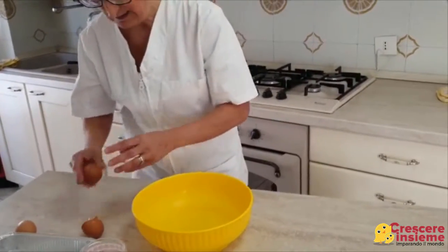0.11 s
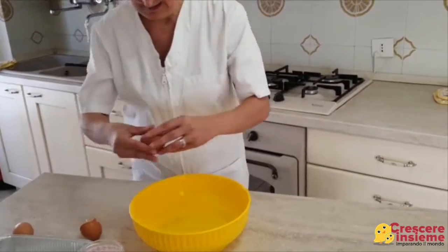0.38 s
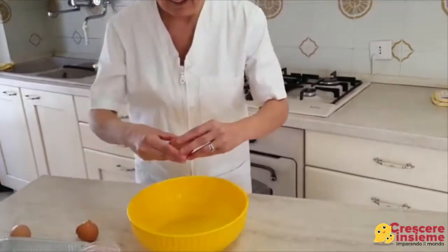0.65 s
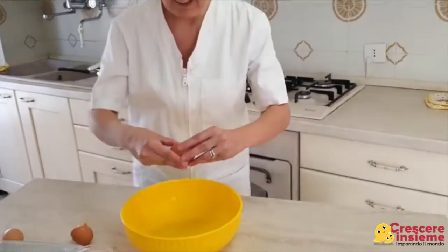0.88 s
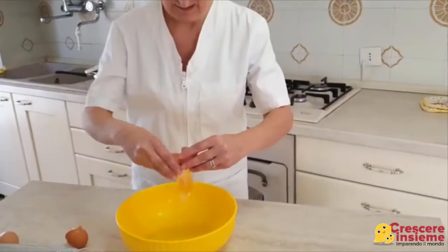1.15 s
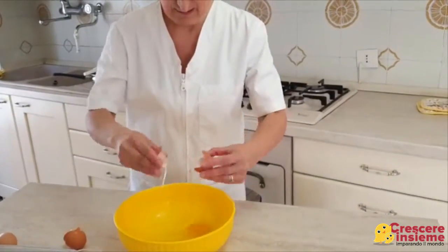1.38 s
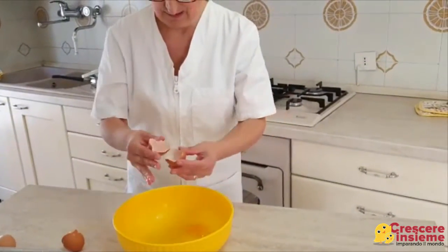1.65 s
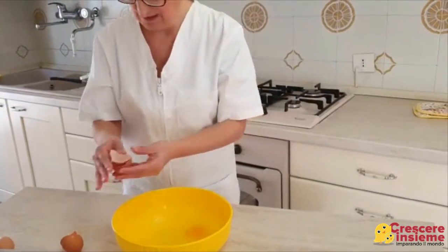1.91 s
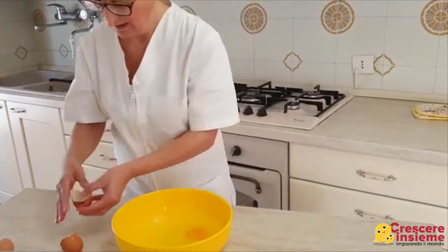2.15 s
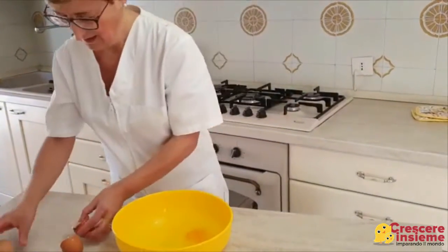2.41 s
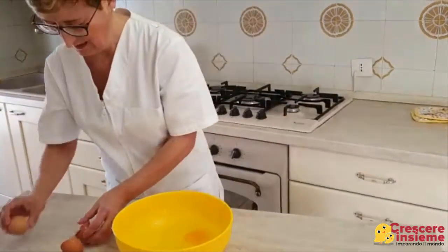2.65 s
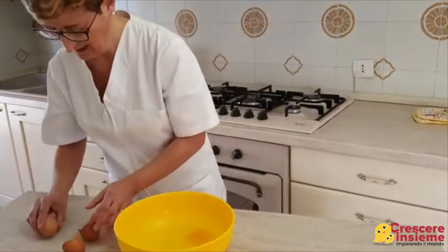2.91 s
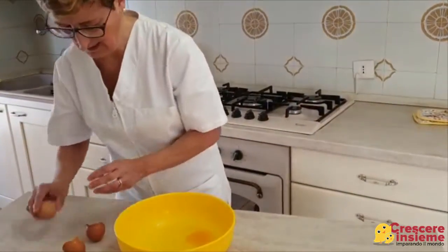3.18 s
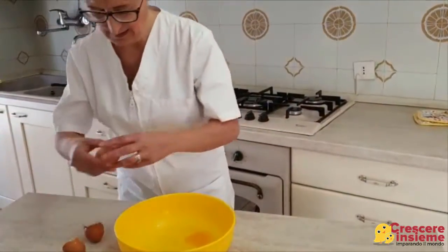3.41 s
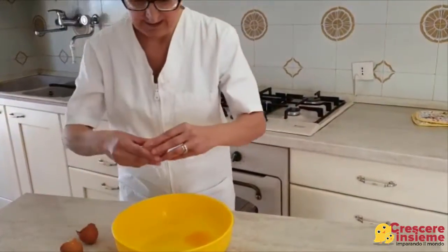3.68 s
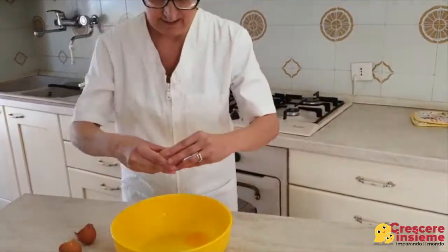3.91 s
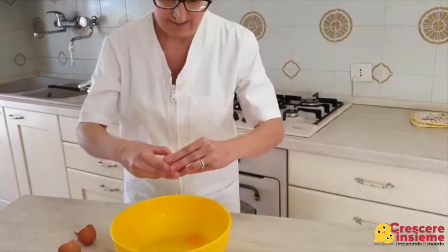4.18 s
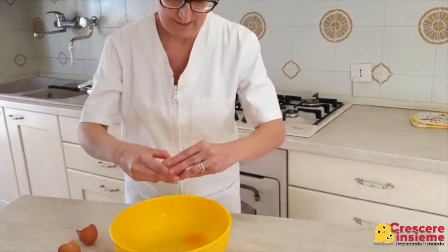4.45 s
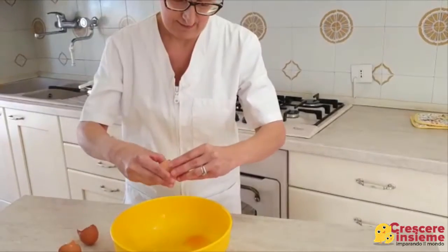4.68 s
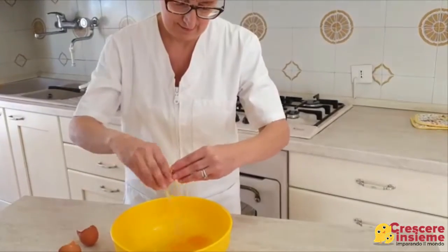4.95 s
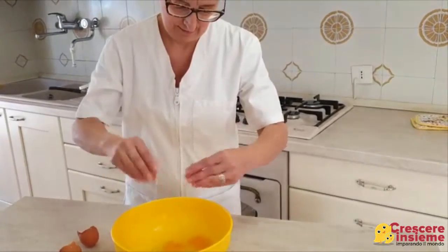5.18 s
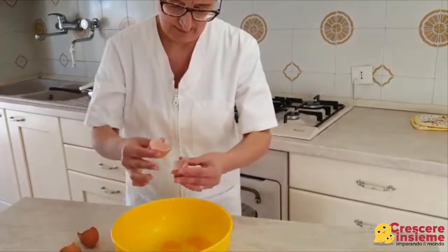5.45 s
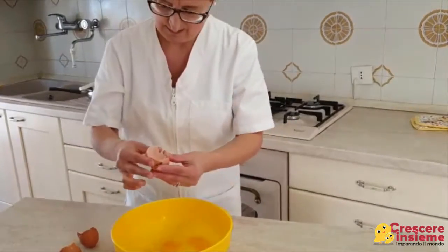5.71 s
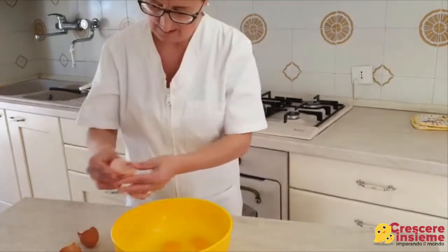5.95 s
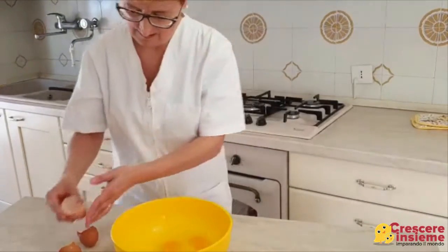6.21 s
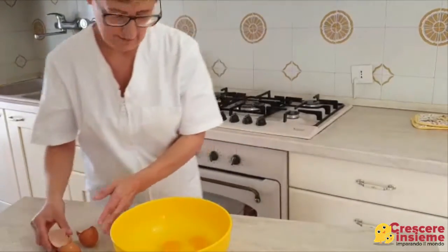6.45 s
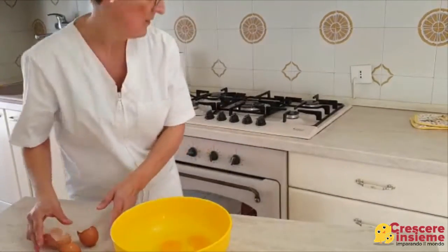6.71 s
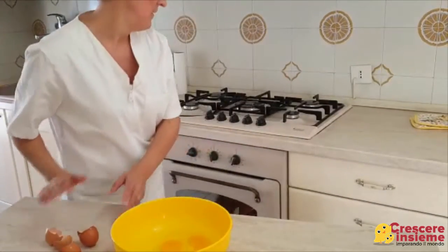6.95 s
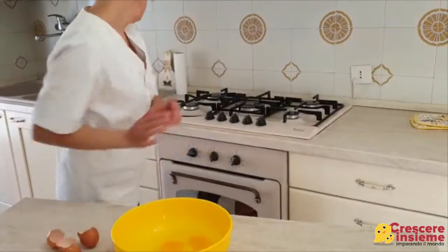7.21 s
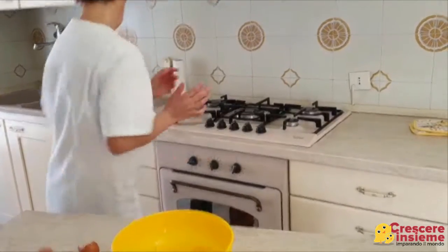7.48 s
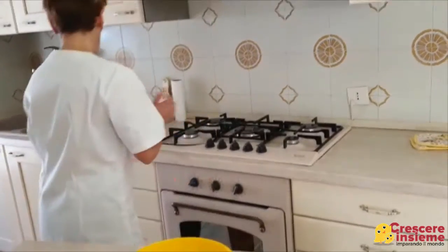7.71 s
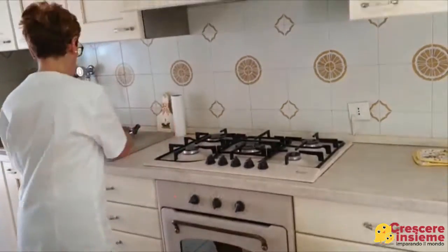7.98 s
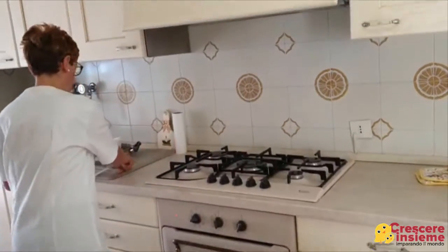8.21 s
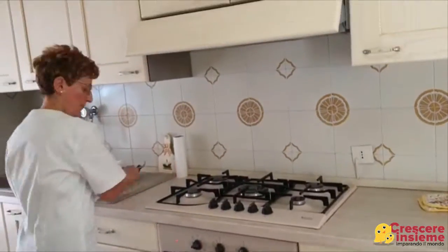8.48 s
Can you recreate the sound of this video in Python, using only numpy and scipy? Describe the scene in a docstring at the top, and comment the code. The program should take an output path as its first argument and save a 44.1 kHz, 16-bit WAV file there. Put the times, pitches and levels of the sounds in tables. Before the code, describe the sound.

Eggs are knocked on a stone counter and pulled open with crisp shell crackles, then shells clatter down in an echoing kitchen.

```python
"""Eggs opened in a hard kitchen

Two eggs are knocked on a stone counter, pulled open over a plastic bowl and their shells are nested and put down,
a few metres from a two-microphone phone in an echoing kitchen. Then a shoe squeaks, feet fall near the phone and a
hand works at the steel sink. A fridge hums as beating sines and traffic rumbles far off as narrow noise. Random
slips drive the shells, stone and steel through coloured pulses and resonances; footfalls are low dying sines;
cloth and skin brush as swells of noise.
"""
import sys
import numpy as np
from scipy import signal
from scipy.fft import rfft, irfft, next_fast_len
from scipy.io import wavfile

SR = 44100
rng = np.random.default_rng(int(sys.argv[2]) if len(sys.argv) > 2 else 0)


def master_out(mix):
    """Clip the mix to full scale and print it as 16-bit PCM to the path in sys.argv[1]."""
    frames = np.transpose(np.atleast_2d(mix))
    ceiling = np.clip(frames, -1, 1)
    pcm = np.round(ceiling * 32767).astype(np.int16)
    wavfile.write(sys.argv[1], SR, pcm)


def ratio_of_db(decibels):
    """Turn decibels (scalar or array-like) into linear amplitude factors; 0 dB maps to 1."""
    return 10 ** (np.asarray(decibels, float) / 20)


N = 379655
LEAD = SR // 5   # samples ahead of time zero, for sounds already under way
SIZE = next_fast_len(N + LEAD + 2 * SR)   # samples, with space for the echoes

# Levels of handled sounds are dry, ahead of the room. Brightening is in dB per octave, pivoting at 1 kHz.
# Egg on the stone counter. Each row: start in seconds, level in dB, brightening, cabinet boom in dB.
KNOCKS = [(-.03, -25.5, -1.2, -38.5), (2.9341, -14, 1.1, -30), (3.074, -20, 1.43, -29)]
# Colour of a knock. Each row: frequency in Hz, relative density in dB per Hz.
KNOCK_COLOUR = [(29, -57.5), (50, -36.5), (155, -10), (203, -12.5), (284, -12.5), (507, -10), (783, -14),
                (842, -7.5), (1070, -9.5), (1700, -9), (4040, -25), (7040, -22.5), (8140, -35),
                (14500, -36), (16000, -57.5)]
# Boom under the counter. Each row: frequency in Hz, width of each resonance pass in Hz, relative level in dB.
CABINET_MODES = [(110.1, 53, -1.5), (72, 14., -10.5)]
# A shell splits or is pulled apart. Each row: start in seconds, hollow ring in dB, ring frequency in Hz,
# brittle snap in dB, sharpness in ring Hz per Hz of width.
SHELL_TEARS = [(-.03, -32, 2780, -60, 1.1), (0.918, -57.5, 3410, -52.5, 2.4),
               (1.246, -54, 2520, -56.5, 1.9), (1.31, -53, 2900, -56.5, 1.9), (1.375, -61, 3070, -65, 1.7),
               (1.691, -30.5, 2190, -40.5, 1.7), (2.09, -51.5, 1840, -61, 3.6),
               (5.067, -50, 3340, -69, 5.4), (5.665, -55, 2570, -47.5, 3.4)]
# Shell ticks and cracks. Each row: start in seconds, hollow ring in dB, ring frequency in Hz,
# brittle snap in dB, snap brightening.
SHELL_TICKS = [(0.6995, -80, 2620, -55, -6), (0.7738, -73, 2540, -58.5, 1.5), (0.88, -76, 3140, -52, 4),
               (2.1137, -53, 2470, -55.5, 5), (2.1638, -56.5, 1880, -54, -2),
               (2.5569, -50.5, 1900, -53, -9), (4.098, -70.5, 4050, -58, -3),
               (4.124, -60.5, 3610, -48, -3.5), (4.1715, -75.5, 2660, -46.5, -4),
               (4.6149, -57, 4070, -38.5, -2.2), (4.8208, -56, 3200, -52.5, -5),
               (4.8506, -75.5, 3310, -49.5, -4), (4.929, -52.5, 3230, -60, 2),
               (5.0349, -51, 3700, -57.5, -6), (5.1607, -66, 3370, -78, -6.5),
               (5.2558, -56, 2950, -64.5, -4), (5.261, -57.5, 3910, -76.5, -10),
               (5.55, -31.5, 2620, -48.5, -5.2), (5.6346, -38.5, 2530, -44.5, -5),
               (5.7406, -44.5, 2240, -58, -4), (5.789, -59.5, 1560, -53, -4), (5.865, -65, 2590, -69, -11),
               (5.9396, -66.5, 2380, -59.5, -4), (5.985, -56.5, 2450, -67.5, -1),
               (6.062, -56, 2370, -71, -9), (6.1763, -55, 2390, -67, -6.5), (6.715, -49, 3050, -46, -4),
               (6.739, -55, 1800, -47.5, -2.5)]
# Colour of a brittle snap. Each row: frequency in Hz, relative density in dB per Hz.
SNAP_COLOUR = [(290, -38), (500, -19), (613, -27), (960, -14), (1440, -9), (3390, 3), (3650, 2.5),
               (6060, 5.5), (6610, 9.5), (8450, -1), (14200, 2.5), (15100, -27), (16000, -80.5)]

# Fridge: two motors a little apart. Each row: frequency in Hz, rms level in dB.
FRIDGE_HUM = [(99.85, -65), (100.62, -61.5)]
# An engine outside slows down, then idles. Each row: time in seconds, rumble centre in Hz.
RUMBLE_CENTRE = [(0, 77.86), (2.75, 55.72), (3.1, 61.1), (8.61, 63.14)]
# The rumble swells. Each row: time of the top in seconds, added rms level in dB, seconds from top to 1/e.
RUMBLE_SWELLS = [(.02, -48.5, 0.13), (0.595, -49.5, .15), (1.601, -53.5, 0.53), (3.75, -50, 0.098),
                 (4.891, -55, 0.42), (5.833, -50.5, 0.11), (6.764, -64, .1)]
# Colour of the room air. Each row: frequency in Hz, relative density in dB per Hz.
AIR_COLOUR = [(18, -14), (30, -19.5), (60, -6.5), (91, 1.5), (117, -4), (152, -7), (393, -15), (624, -23.5),
              (1100, -26), (1610, -24), (2310, -31), (2920, -24.5), (6810, -27), (9770, -46),
              (11100, -35.5), (14000, -72)]
# Loudness of the room air. Each row: time in seconds, rms level above 130 Hz in dB.
AIR_LOUDNESS = [(0, -62), (2.4, -64.5), (4., -66.5), (5.4, -69), (6.3, -63.5), (8.1, -61.5), (8.61, -70)]

# Cloth and skin brushing. Each row: start in seconds, length in seconds, level in dB, brightening.
BRUSH_STROKES = [(0.882, 0.049, -55, 4), (2.083, 0.085, -51.5, 6), (5.908, .2, -60.5, 5),
                 (6.934, 0.13, -52, -1), (7.195, 0.14, -45.5, 1.1), (7.821, 0.29, -49, 1.4),
                 (8.161, 0.036, -53, -2), (8.26, 0.047, -40.5, 0.9), (8.399, 0.28, -55.5, 2.3)]
# Colour of a brush stroke. Each row: frequency in Hz, relative density in dB per Hz.
BRUSH_COLOUR = [(88, -29), (150, -16), (289, -13), (331, -18.5), (401, -2.5), (674, -1.5), (6550, -11),
                (8410, -23), (11900, -22.5), (15000, -52)]
# Yolk in the bowl, hands and hips against the furniture. Each row: start in seconds, level in dB,
# resonance in Hz, gain of the resonance beside the plain push, brightening.
SOFT_THUDS = [(1.244, -38, 550, 4.8, -1), (1.397, -55.5, 536, 2.4, -3), (1.7, -50, 160, 6, -4),
              (2.494, -40, 680, 7.9, -3), (2.53, -44.5, 342, 2.5, -2), (4.952, -42.5, 305, 0.48, -0.5),
              (8.176, -45, 146, 13, -11), (8.2, -51, 745, 1.2, 3)]
# Colour of a thud's push. Each row: frequency in Hz, relative density in dB per Hz.
THUD_COLOUR = [(59, -44), (100, -4), (141, -11), (314, -4), (436, -11.5), (531, -6.5), (882, -10),
               (1040, -15), (2390, -14), (5000, -29), (6500, -55.5), (11000, -120)]
# Nested shells set down and rocking on the counter. Each row: start in seconds, level in dB, brightening,
# decay of the slips in ms.
SHELLS_DOWN = [(6.417, -18.5, 1.7, 1.7), (6.701, -42.5, 1.5, 1.6), (6.776, -41.5, -5, 2.5),
               (7.212, -46, -3, 18)]
# Colour of the shells on the counter. Each row: frequency in Hz, relative density in dB per Hz.
CLATTER_COLOUR = [(88, -67), (150, -39), (196, -17), (283, -25.5), (378, -11.5), (450, -15), (505, -1.5),
                  (612, -7), (1300, -6), (1850, -4.5), (2450, 2), (3100, -4.5), (4460, -26.5),
                  (6430, -22.5), (8250, -41), (12100, -42.5), (15000, -68.5)]
# Footsteps near the phone. Each row: start in seconds, level in dB before the soft onset,
# frequency in Hz, t60 in seconds.
FOOTFALLS = [(8.145, -40, 141, 0.18), (8.172, -35.5, 135, .15), (8.245, -37, 72, 0.14)]
# The sink is bumped and scraped. Each row: start in seconds, level in dB, decay of the slips in ms,
# contact corner in Hz.
SINK_CONTACTS = [(8.203, -58, 13, 900), (8.217, -54, 3., 5000), (8.268, -40, 17, 6000),
                 (8.31, -60, 10., 6000), (8.377, -70, 20., 1500), (8.5, -59, 25, 300)]
# Modes of the steel sink. Each row: frequency in Hz, typical level in dB, t60 in seconds.
SINK_MODES = [(246, -11, 0.13), (290, -17, 0.18), (726, -35, .04), (1160, -16, 0.17), (1403, -1, 0.07),
              (2060, -14, 0.025), (2450, 0.5, 0.015), (2900, 4.5, 0.016), (3500, 2, 0.0074),
              (4860, -2, 0.0089)]

# Decay of the kitchen. Each row: frequency in Hz, t60 in seconds.
KITCHEN_T60 = [(100, 0.83), (300, 0.95), (700, 0.79), (1800, 0.73), (5000, 0.59), (9000, 0.53),
               (14000, 0.4)]
# First echoes from counter and walls. Each row: delay in ms, left gain in dB, right gain in dB.
FIRST_ECHOES = [(3.124, 21, 7.5), (10.16, -21.5, 4.5), (15.31, 12, 8.5), (19.3, 10, -13.5), (25.66, 15, 12),
                (41.5, 10, -1)]
# Likeness of a diffuse field at the two microphones. Each row: frequency in Hz, left-right correlation.
MIC_LIKENESS = [(60, .98), (130, .97), (290, .9), (640, .5), (1410, -.2), (3100, .03), (15000, .01)]
# Colour difference of the two microphones. Each row: frequency in Hz, left minus right in dB.
MIC_LEAN = [(60, 2.1), (200, 1.1), (380, -1.5), (700, 0.5), (1290, 0.5), (2380, -1), (4400, -2),
            (8120, -3.5), (15000, -4.5)]


def at_hz(points, hz):
    """Reads a table on a log-frequency axis."""
    known, value = np.transpose(points)
    return np.interp(np.log(np.maximum(hz, 1)), np.log(np.maximum(known, 1)), value)


def in_time(points):
    """Reads a table at every sample."""
    seconds, value = np.transpose(points)
    return np.interp(np.arange(N) / SR, seconds, value)


def unit(x):
    """Scales a sound to energy 1."""
    return x / np.sqrt(np.sum(x ** 2) + 1e-30)


def shortest(magnitude):
    """Spectrum of the shortest causal pulse of this magnitude (folded cepstrum)."""
    cepstrum = irfft(np.log(magnitude + 1e-9))
    half = len(cepstrum) // 2
    cepstrum[1:half] *= 2
    cepstrum[half + 1:] = 0
    return np.exp(rfft(cepstrum))


def pulse(colour, tilt_db, size=4096):
    """A click with this colour, tilted by so many dB per octave."""
    hz = np.fft.rfftfreq(size, 1 / SR)
    db = at_hz(colour, hz) + tilt_db * np.log2(np.maximum(hz, 20) / 1000)
    return unit(irfft(shortest(ratio_of_db(db))))


def burst(ms, size=4096):
    """A fracture: one sharp slip and dying random after-slips, spread in time, only a little uneven in colour."""
    decay = np.exp(-np.arange(size) / (ms * SR / 1000))
    slips = rng.standard_normal(size) ** 3 * decay
    slips[0] = 1.3
    spectrum = rfft(slips, 2 * size)
    # 0 leaves the colour as drawn, 1 makes it flat
    evenness = 0.75
    evened = spectrum / shortest(np.abs(spectrum) ** evenness)
    return unit(irfft(evened)[:size])


def coloured(sound, colour, tilt_db):
    """Gives a sound the colour of a pulse."""
    return signal.fftconvolve(sound, pulse(colour, tilt_db))


def resonate(x, hz, width_hz):
    """Two-pole resonance, gain 1 on top."""
    r = np.exp(-np.pi * width_hz / SR)
    poles = [1, -2 * r * np.cos(2 * np.pi * hz / SR), r * r]
    return signal.lfilter([(1 - r * r) / 2, 0, (r * r - 1) / 2], poles, x)


def ring(slips, hz, width_hz):
    """Two resonances in a row: a narrow tone with a soft onset, energy 1."""
    once = resonate(slips, hz, width_hz)
    return unit(resonate(once, hz, width_hz))


def silence():
    """An empty track that starts LEAD samples early."""
    return np.zeros(N + LEAD)


def add(track, start_s, sound):
    """Lays a sound into a track that starts LEAD samples early."""
    at = LEAD + round(start_s * SR)
    track[at:at + len(sound)] += sound[:len(track) - at]


def stereo_noise(size):
    """Spectra of a diffuse field at two close microphones: alike in the bass, nearly unrelated in the treble."""
    hz = np.fft.rfftfreq(size, 1 / SR)
    mid, side = rfft(rng.standard_normal((2, size)))
    alike = np.clip(at_hz(MIC_LIKENESS, hz), -0.98, 0.98)
    sign = np.array([[1], [-1]])
    return hz, (np.sqrt(1 + alike) * mid + sign * np.sqrt(1 - alike) * side) / np.sqrt(2)


def counter_knocks():
    """Egg on stone: a short coloured fracture, whose slips also make the cabinet below boom."""
    out = silence()
    for s, db, tilt_db, boom_db in KNOCKS:
        slips = burst(2.5)
        add(out, s, ratio_of_db(db) * unit(coloured(slips, KNOCK_COLOUR, tilt_db)))
        for hz, width_hz, mode_db in CABINET_MODES:
            add(out, s, ratio_of_db(boom_db + mode_db) * ring(slips, hz, width_hz))
    return out


def add_crack(out, s, ring_db, hz, snap_db, ms, sharpness, tilt_db):
    """Breaking shell: the same slips drive its hollow ring and its brittle snap."""
    slips = burst(ms)
    add(out, s, ratio_of_db(ring_db) * ring(slips, hz, hz / sharpness))
    add(out, s, ratio_of_db(snap_db) * unit(coloured(slips, SNAP_COLOUR, tilt_db)))


def shell_tears():
    """Shell splitting or pulled apart: a long run of slips, decaying over 59 ms."""
    out = silence()
    for s, ring_db, hz, snap_db, sharpness in SHELL_TEARS:
        add_crack(out, s, ring_db, hz, snap_db, ms=59, sharpness=sharpness, tilt_db=-4)
    return out


def room_air():
    """Diffuse coloured noise around the phone, its level drifting."""
    hz, field = stereo_noise(SIZE)
    shape = ratio_of_db(at_hz(AIR_COLOUR, hz))
    shape /= np.sqrt(np.mean(shape ** 2 * (hz > 130)))
    return ratio_of_db(in_time(AIR_LOUDNESS)) * irfft(field * shape, SIZE)[:, :N]


def fridge():
    """Two steady sines a little apart beat slowly; the first also has a third harmonic."""
    in_step_s, third_peak_db = 0.7, -75.5
    turns = 2 * np.pi * (np.arange(N) / SR - in_step_s)
    hum = sum(np.sqrt(2) * ratio_of_db(db) * np.sin(hz * turns) for hz, db in FRIDGE_HUM)
    return hum + ratio_of_db(third_peak_db) * np.sin(3 * FRIDGE_HUM[0][0] * turns)


def traffic():
    """Far-off engine: narrow noise around a moving centre, swelling and sinking back."""
    rest_db = -63.5
    t = np.arange(N) / SR
    # slow complex noise shifted up to the moving centre makes a narrow band
    lowpass = signal.butter(2, 5.0, fs=SR, output="sos")
    slow = signal.sosfilt(lowpass, rng.standard_normal((2, N + SR)))[:, SR:]
    turn = 2 * np.pi * np.cumsum(in_time(RUMBLE_CENTRE)) / SR
    rumble = unit(slow[0] * np.cos(turn) + slow[1] * np.sin(turn)) * np.sqrt(N)
    swells = sum(ratio_of_db(db) * np.exp(-((t - s) / width_s) ** 2) for s, db, width_s in RUMBLE_SWELLS)
    return (ratio_of_db(rest_db) + swells) * rumble


def shell_ticks():
    """Small cracks: slips dying within a millisecond or so, with a hollow ring and a brittle snap."""
    out = silence()
    for s, ring_db, hz, snap_db, tilt_db in SHELL_TICKS:
        add_crack(out, s, ring_db, hz, snap_db, ms=0.9, sharpness=5.8, tilt_db=tilt_db)
    return out


def brushes():
    """Cloth and skin: each stroke is a swell of coloured noise."""
    out = silence()
    for s, length_s, db, tilt_db in BRUSH_STROKES:
        noise = rng.standard_normal(SR // 2)[:round(length_s * SR)]
        swell = np.sin(np.linspace(0, np.pi, len(noise))) ** 0.41
        add(out, s, ratio_of_db(db) * unit(coloured(noise * swell, BRUSH_COLOUR, tilt_db)))
    return out


def thuds():
    """Soft contacts: a dull push, plus its own broad resonance."""
    out = silence()
    for s, db, hz, share, tilt_db in SOFT_THUDS:
        push = coloured(burst(5.4), THUD_COLOUR, tilt_db)
        add(out, s, ratio_of_db(db) * unit(push + share * resonate(push, hz, hz / 3.9)))
    return out


def shells_set_down():
    """Nested shells on stone: short runs of slips with the colour of the clatter."""
    out = silence()
    for s, db, tilt_db, ms in SHELLS_DOWN:
        add(out, s, ratio_of_db(db) * unit(coloured(burst(ms), CLATTER_COLOUR, tilt_db)))
    return out


def shoe():
    """Rubber sole on tile sticks and slips at a falling rate: a fading near sine with a weak octave."""
    start_s, length_s, edge_s = 7.326, 0.066, 0.0052
    start_hz, sag_hz_per_s = 2032, 11000
    start_db, fade_db_per_s = -65, 180
    out = silence()
    t = np.arange(round(length_s * SR)) / SR
    phase = 2 * np.pi * np.cumsum(start_hz - sag_hz_per_s * t) / SR
    edges = np.clip(np.minimum(t, t[::-1]) / edge_s, 0, 1)
    tone = np.sin(phase) + 0.17 * np.sin(2 * phase)
    add(out, start_s, ratio_of_db(start_db - fade_db_per_s * t) * edges * tone)
    return out


def footfalls():
    """Footsteps near the phone: low dying thumps carried through the floor, without the echoes of the room."""
    out = silence()
    t = np.arange(SR // 2) / SR
    onset = 1 - np.exp(-t / 0.0042)
    for s, db, hz, t60 in FOOTFALLS:
        add(out, s, ratio_of_db(db - 60 * t / t60) * onset * np.sin(2 * np.pi * hz * t))
    return out[LEAD:]


def sink():
    """Every contact excites the same steel modes, unevenly; soft contacts reach mainly the low ones."""
    out = silence()
    t = np.arange(SR // 2) / SR
    for s, db, ms, contact_hz in SINK_CONTACTS:
        changes_db = rng.normal(0, 2.5, len(SINK_MODES))
        modes = np.zeros(len(t))
        for (hz, mode_db, t60), change_db in zip(SINK_MODES, changes_db):
            softness_db = 4.3 * np.log2(1 + (hz / contact_hz) ** 2)
            decay = ratio_of_db(mode_db + change_db - softness_db - 60 * t / t60)
            modes += decay * np.sin(2 * np.pi * hz * t)
        add(out, s, ratio_of_db(db) * unit(signal.fftconvolve(burst(ms), modes)))
    return out


def kitchen(track):
    """Direct sound and first echoes, with a dense echo field that fills in and dies band by band."""
    direct_db, fill_ms = 19.5, 3.8
    hz, field = stereo_noise(2 * SR)
    t = np.arange(2 * SR) / SR
    tail = 0
    # overlapping half-octave bands
    centres = 62.5 * 2 ** np.arange(0, 9, 0.5)
    place = 2 * np.log2(np.clip(hz, centres[0], centres[-1]) / centres[0])
    for k, centre in enumerate(centres):
        band = irfft(field * np.maximum(1 - np.abs(place - k), 0))
        tail = tail + band * ratio_of_db(-60 * t / at_hz(KITCHEN_T60, centre))
    tail = tail * (1 - np.exp(-t * 1000 / fill_ms))
    tail[:, 0] = ratio_of_db(direct_db)
    for ms, *side_db in FIRST_ECHOES:
        tail[:, round(ms * SR / 1000)] += ratio_of_db(side_db)
    return irfft(rfft(track, SIZE) * rfft(tail, SIZE), SIZE)[:, LEAD:LEAD + N]


def scene():
    """Handled sounds go through the kitchen; footfalls and background reach the phone without its echoes."""
    eggs = counter_knocks() + shell_ticks() + shell_tears() + shells_set_down() + thuds()
    handled = eggs + brushes() + shoe() + sink()
    in_kitchen = kitchen(handled)
    background = room_air() + fridge() + traffic()
    return in_kitchen + footfalls() + background


def band_limit(x):
    """A steep low-pass at the top of the band."""
    return signal.sosfilt(signal.butter(12, 16500, fs=SR, output="sos"), x)


def record(dry):
    """The phone's two microphones differ a little in colour and lose the deepest bass."""
    lean_db = at_hz(MIC_LEAN, np.fft.rfftfreq(SIZE, 1 / SR)) / 2
    heard = irfft(rfft(dry, SIZE) * ratio_of_db([lean_db, -lean_db]), SIZE)[:, :N]
    bass_cut = signal.butter(2, 48, "high", fs=SR, output="sos")
    heard = signal.sosfilt(bass_cut, heard)
    return band_limit(heard)


dry = scene()
out = record(dry)
master_out(out)
```